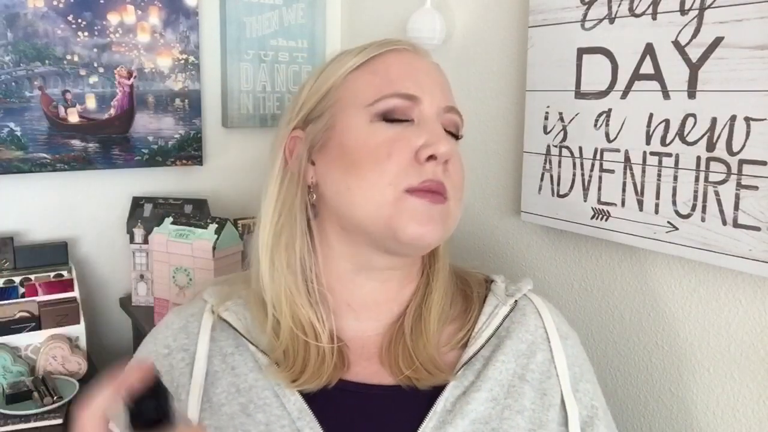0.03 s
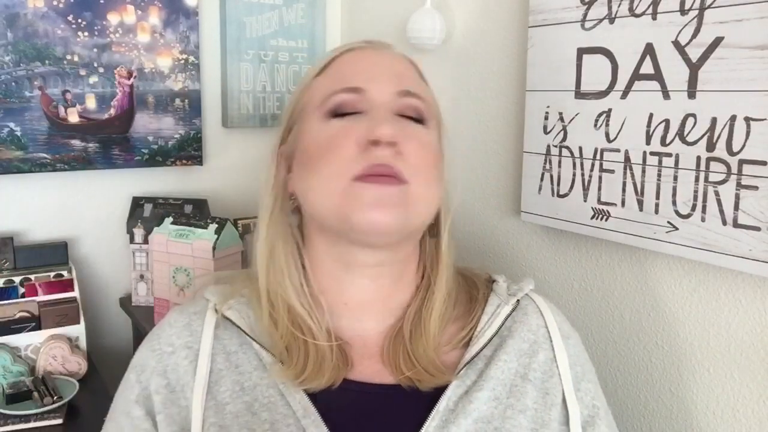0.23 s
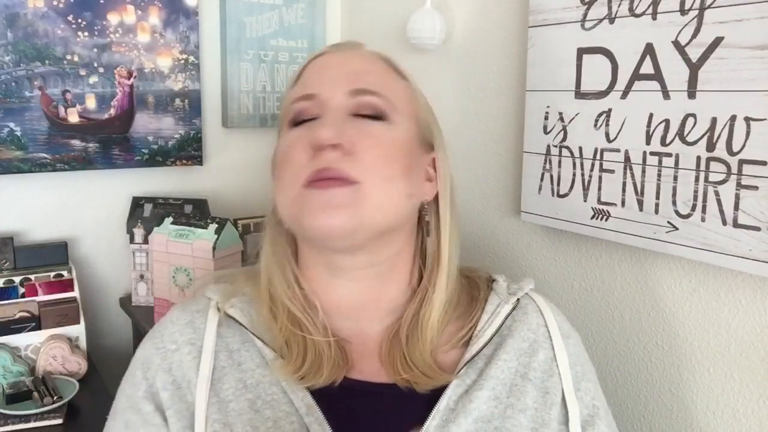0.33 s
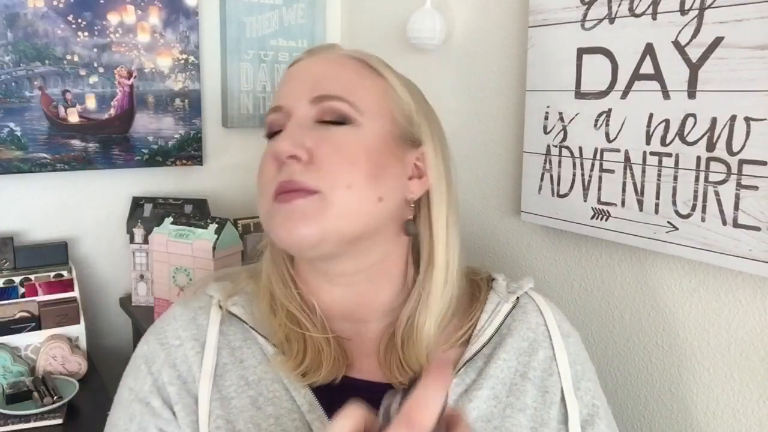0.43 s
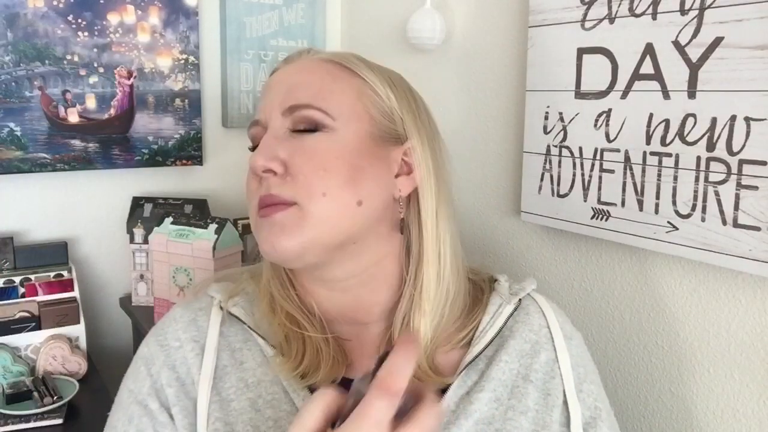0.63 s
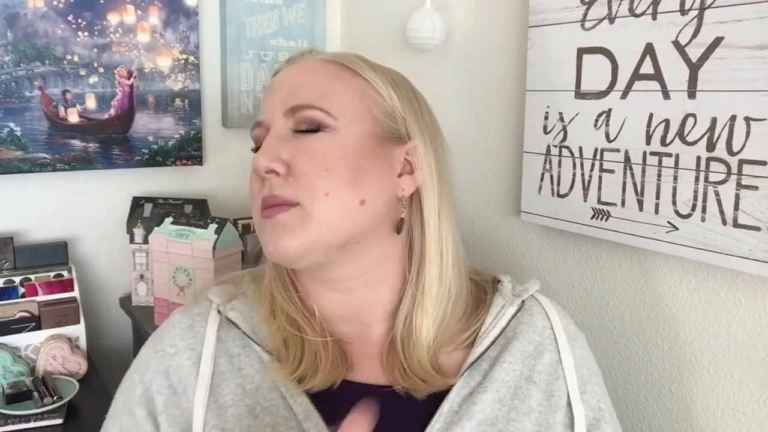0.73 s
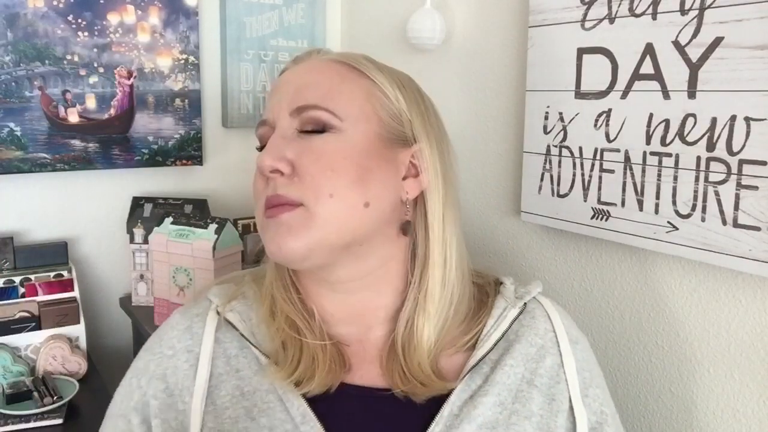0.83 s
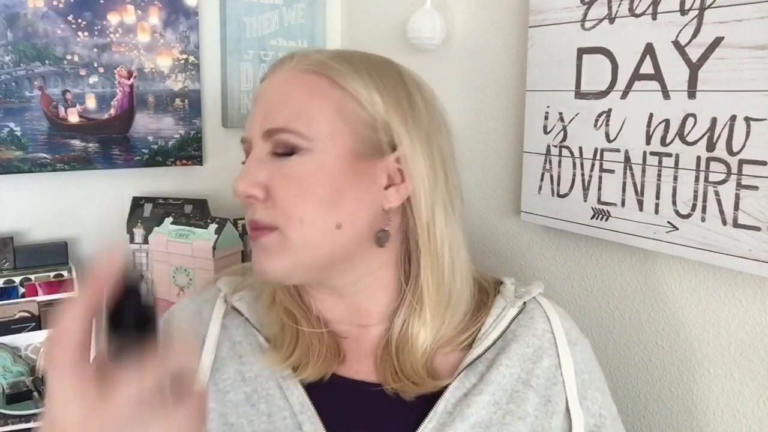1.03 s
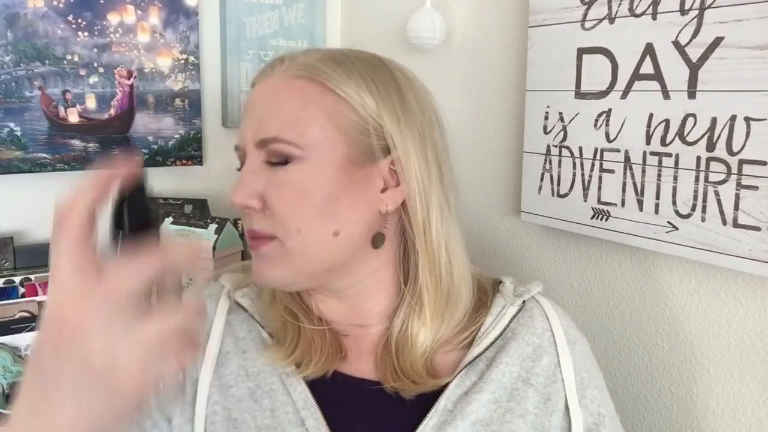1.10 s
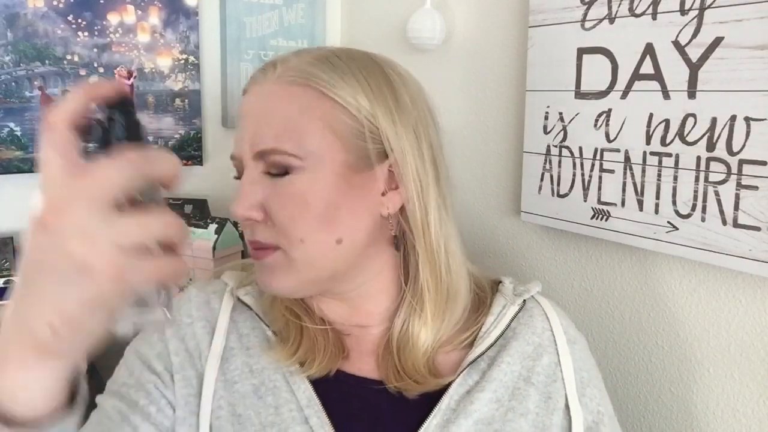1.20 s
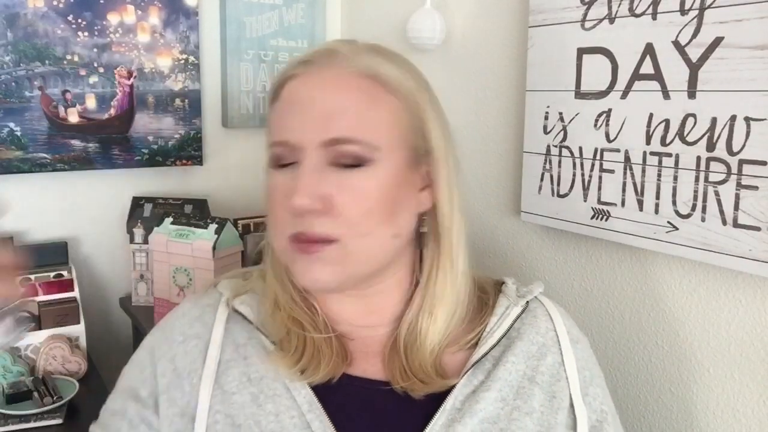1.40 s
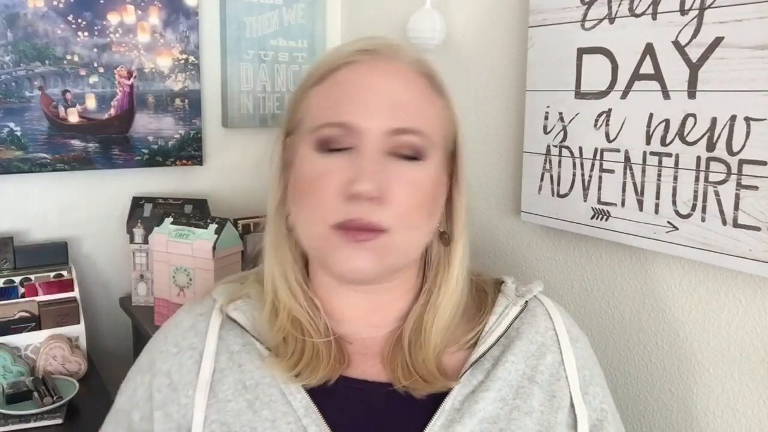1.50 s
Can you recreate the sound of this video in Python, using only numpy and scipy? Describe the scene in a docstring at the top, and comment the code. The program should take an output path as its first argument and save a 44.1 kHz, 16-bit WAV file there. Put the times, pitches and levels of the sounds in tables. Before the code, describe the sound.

Short spritzes from a pump spray bottle, some soft, some harder and juddering, with light clicks.

```python
"""A fine-mist pump bottle, worked close by in a small room.
Three smooth strokes give soft puffs of mist. Three hard ones judder: the plunger sticks and slips about
seventy times a second, each slip a snap that rings the bottle. Between strokes the cap ticks in the
hand and the bottle bloops as the pump refills. Faint room air lies underneath."""
import sys
import numpy as np
from scipy import signal
from scipy.fft import rfft, irfft, next_fast_len
from scipy.io import wavfile

SR = 44100
rng = np.random.default_rng(int(sys.argv[2]) if len(sys.argv) > 2 else 0)


def store_wav(level_fs):
    """Save 16-bit WAV to argv[1]."""
    pcm = np.round(np.clip(np.atleast_2d(level_fs), -1, 1) * 32767)
    wavfile.write(sys.argv[1], SR, pcm.T.astype(np.int16))


N = 68355


def amp(db):
    return 10 ** (np.asarray(db) / 20)


def unit_energy(x):
    return x / (np.linalg.norm(x) + 1e-12)


def fade(t, t60_s):
    return np.exp(-np.log(1000) * t / t60_s)


def along(points, hz):
    """Interpolate (f/Hz, value) points on a log frequency axis."""
    f, values = np.transpose(points)
    return np.interp(np.log(hz + 1), np.log(f + 1), values)


def add(track, at_s, sound):
    i = int(np.clip(round(at_s * SR), 0, N - 1))
    track[i:i + len(sound)] += sound[:N - i]


def noise(spectrum, tilt_db_per_oct=0):
    """Coloured noise, rms 1."""
    hz = np.fft.rfftfreq(N, 1 / SR)
    gain = amp(along(spectrum, hz) + tilt_db_per_oct * np.log2(hz + 1))
    x = irfft(rfft(rng.standard_normal(N)) * gain, N)
    return x / np.sqrt(np.mean(x ** 2) + 1e-20)


def click(spectrum, decay_s, size=2048):
    """Brief rough contact: a noise burst, part whitened, then coloured; energy 1."""
    t = np.arange(size) / SR
    gain = amp(along(spectrum, np.fft.rfftfreq(size, 1 / SR)))
    cepstrum = irfft(np.log(gain))
    cepstrum[1:size // 2] *= 2  # fold to minimum phase
    cepstrum[size // 2 + 1:] = 0
    burst = rfft(rng.standard_normal(size) * np.exp(-t / decay_s))
    whitened = burst / np.sqrt(np.abs(burst) + 1e-9)
    return unit_energy(irfft(whitened * np.exp(rfft(cepstrum)))[:size // 2])


def ring(hz, t60_s, attack_s, size=4096):
    """One damped mode, energy 1."""
    t = np.arange(size) / SR
    return unit_energy(np.sin(2 * np.pi * hz * t) * fade(t, t60_s) * (1 - np.exp(-t / attack_s)))


AIR_SPECTRUM = [(20, -40), (32, -24), (44, -3), (54, 9), (75, -7), (120, -1), (180, -7.5), (400, -8.5),
                (1000, -13), (3000, -15), (7000, -18.5), (11000, -24.5), (15500, -30)]  # f/Hz, level/dB


def room_air():
    """Steady background noise, mostly low rumble."""
    return amp(-69.5) * noise(AIR_SPECTRUM)


REFILL_BLOOPS = [(0.013, 1012, -40, 0.0051), (0.0021, 1050, -52.5, 0.0042), (1.381, 1040, -50, 0.0056)]  # t/s, f/Hz, peak/dB, half width/s


def bloops():
    """The pump refills: short hollow tones of the bottle."""
    t, out = np.arange(N) / SR, np.zeros(N)
    for at_s, hz, db, width_s in REFILL_BLOOPS:
        out += amp(db) * np.exp(-((t - at_s) / width_s) ** 2) * np.sin(2 * np.pi * hz * t)
    return out


CAP_CONTACTS = [(.0075, -33, -56, -42), (.168, -47, -35, -50), (0.199, -30, -50, -64),
                (.379, -33, -38, -48), (0.433, -48, -61, -58), (.610, -28, -38, -43.5),
                (.668, -49, -60, -58), (.896, -39, -61, -47), (0.9314, -32.5, -62, -33),
                (0.9358, -28.5, -66, -43), (0.941, -31, -43, -41), (1.0919, -26.5, -29, -27.5),
                (1.1191, -27.5, -36, -35), (1.172, -41, -44.5, -52), (1.377, -31.5, -38, -52)]  # t/s, tick/dB, bottle ring/dB, cap ring/dB
TICK_SPECTRUM = [(600, -19), (1400, -1.5), (2000, -1), (2600, -2.5), (3600, 1.5), (4800, -4), (6200, 0),
                 (9500, -5), (12000, -3), (15500, -9)]  # f/Hz, level/dB
BOTTLE_MODES = [(1023, -2.5, 0.038), (1540, -4.5, 0.026), (2010, -9.5, 0.035)]  # f/Hz, level/dB, T60/s


def cap_ticks():
    """Finger on cap: each contact clicks and rings cap and bottle."""
    out = np.zeros(N)
    for at_s, tick_db, bottle_db, cap_db in CAP_CONTACTS:
        add(out, at_s, amp(cap_db) * ring(hz=3320, t60_s=0.0068, attack_s=0.00051))
        add(out, at_s, amp(tick_db) * click(TICK_SPECTRUM, decay_s=0.0012))
        for hz, mode_db, t60_s in BOTTLE_MODES:
            detune = 1 + rng.normal(0, 0.0093)
            add(out, at_s, amp(bottle_db + mode_db) * ring(hz * detune, t60_s, attack_s=0.0021))
    return out


SMOOTH_STROKES = [(0.031, 0.027, 0.013, 0.072, -45, -0.5), (0.98, 0.018, .008, .044, -50.5, 1),
                  (1.209, .019, 0.036, 0.058, -47, -0.15)]  # t/s, attack/s, hold/s, release/s, level/dB, tilt/(dB/oct)
MIST_SPECTRUM = [(500, -30), (1000, -13.5), (1600, -3), (2300, 2), (3500, 3), (4900, 1.5), (6500, 1),
                 (8500, -2), (10300, -5), (11700, -2), (13500, -7.5), (15500, -1.5)]  # f/Hz, level/dB


def puffs():
    """The nozzle hisses while the pressure swells, holds and sinks."""
    t, out = np.arange(N) / SR, np.zeros(N)
    for at_s, attack_s, hold_s, release_s, db, tilt in SMOOTH_STROKES:
        pressure = np.interp(t, at_s + np.cumsum([0, attack_s, hold_s, release_s]), [0, 1, 1, 0])
        out += amp(db) * np.sin(np.pi / 2 * pressure) ** 2 * noise(MIST_SPECTRUM, tilt)
    return room(out, wet_db=-12)


def slips(sticking, force):
    """Stick-slip of the plunger; yields t/s, snap/dB, bottle/dB."""
    stick_s, waits_ms = np.transpose(sticking)
    force_s, snap_db, bottle_db = np.transpose(force)
    at_s = stick_s[0]
    while at_s <= stick_s[-1]:
        yield at_s, np.interp(at_s, force_s, snap_db), np.interp(at_s, force_s, bottle_db)
        at_s += np.interp(at_s, stick_s, waits_ms) / 1000


STICK_CURVES = [
    [(.2297, 4.85), (.2385, 6.5), (.2545, 15.45), (.278, 17.2), (.293, 12.3), (.313, 3.0)],
    [(.4619, 6.7), (.4845, 14.3), (.52, 14.9), (.563, 12.5)],
    [(.6934, 8.7), (.7085, 14.1), (.728, 15.0), (.768, 12.0), (.808, 11.5)],
]  # per hard stroke: t/s, wait to next slip/ms
FORCE_CURVES = [
    [(.2297, -21.5, -35), (.24, -11.5, -25.5), (.259, -5, -10.5), (.276, -9.5, -6.5), (.292, -3.5, -10.5),
     (.305, -17.5, -10.5), (.313, -44, -35)],
    [(.4619, -21.5, -32), (.478, -9, -13), (.49, -13.5, -8), (.519, -10, -5), (.535, -17, -8),
     (.548, -12, -11.5), (.562, -24, -26)],
    [(.6934, -19.5, -25), (.702, -11.5, -15.5), (.714, -9.5, -12.5), (.743, -14.5, -10), (.77, -19, -13),
     (.794, -14, -17), (.807, -28, -26.5)],
]  # per hard stroke: t/s, snap/dB, bottle/dB
HAND_GRIPS = [(1005, -2.5, 0, -0.5, 6860), (950, -4.5, -3, -6, 7400), (956, -3, -1.5, -8, 8080)]  # per hard stroke: ring f/Hz, ring/dB, knock/dB, creak/dB, nozzle f/Hz
SNAP_SPECTRUM = [(1500, -28), (3500, -1), (5000, -4.5), (7000, 0.5), (8200, -3.5), (10000, -10),
                 (11800, 1.5), (13500, -5), (15500, -6.5)]  # f/Hz, level/dB
KNOCK_SPECTRUM = [(40, -55), (120, -38), (250, -28.5), (480, -7), (750, -7.5), (1100, 3), (1450, -4),
                  (2100, 2.5), (2800, -6), (3800, -15.5), (7000, -25.5)]  # f/Hz, level/dB
SCRAPE_SPECTRUM = [(600, -21.5), (1500, -3), (2700, -2.5), (4300, -3.5), (5500, -7.5), (7200, -12.5),
                   (10000, -6), (15000, -20)]  # f/Hz, level/dB
SPIT_SPECTRUM = [(1500, -19), (3500, -7), (5000, -3.5), (7000, 0), (10000, -6), (12000, 1), (15500, -4.5)]  # f/Hz, level/dB


def judder(stroke):
    """Hard stroke. Per slip: seal creaks, nozzle snaps, bottle knocks and rings, mist spits."""
    ring_hz, ring_db, knock_db, creak_db, nozzle_hz = HAND_GRIPS[stroke]
    creak_lead_s, creak_start_hz, creak_sag_hz_per_s = 0.004, 3454, 16800
    snap_lead_s, knock_lag_s = 0.0002, 0.00022
    start_s = STICK_CURVES[stroke][0][0]
    out, flow, t = np.zeros(N), np.zeros(N), np.arange(SR // 10) / SR
    for at_s, snap_db, bottle_db in slips(STICK_CURVES[stroke], FORCE_CURVES[stroke]):
        snap_gain, bottle_gain = amp(rng.normal([snap_db, bottle_db], 0.2))
        nozzle_detune, low_detune, high_detune, creak_detune = rng.normal(1, 0.019, 4)

        nozzle = amp(-9) * ring(nozzle_hz * nozzle_detune ** 2, t60_s=0.0031, attack_s=0.0002)
        add(out, at_s - snap_lead_s, snap_gain * click(SNAP_SPECTRUM, decay_s=0.0004))
        add(out, at_s - snap_lead_s, snap_gain * nozzle)

        knock = amp(knock_db) * click(KNOCK_SPECTRUM, decay_s=0.00039)
        low_mode = amp(ring_db) * ring(ring_hz * low_detune, t60_s=0.027, attack_s=0.00051)
        high_mode = amp(-15) * ring(2220 * high_detune, t60_s=0.0074, attack_s=0.00051)
        add(out, at_s + knock_lag_s, bottle_gain * knock)
        add(out, at_s, bottle_gain * (low_mode + high_mode))

        if at_s > start_s + creak_lead_s:  # the seal gives just before the slip
            give_s = at_s - creak_lead_s * rng.normal(1, 0.1)
            creak_hz = (creak_start_hz - creak_sag_hz_per_s * (at_s - start_s)) * creak_detune
            seal_gain = bottle_gain * amp(creak_db)
            add(out, give_s, seal_gain * ring(creak_hz, t60_s=0.014, attack_s=0.0002))
            add(out, give_s, seal_gain * amp(-5.5) * click(SCRAPE_SPECTRUM, decay_s=0.0011))
        add(flow, at_s, snap_gain * fade(t, t60_s=0.017))
    spit = amp(-25.5) * flow * noise(SPIT_SPECTRUM)
    return room(out + spit, wet_db=-5)


REFLECTIONS = [(.0023, -12), (.00275, -25.5), (.0044, -15.5), (.0057, -17), (.0087, -17.5)]  # delay/s, level/dB
TAIL_DECAY = [(200, 0.29), (600, 0.29), (1000, 0.27), (2500, 0.29), (7000, 0.29), (15000, 0.22)]  # f/Hz, T60/s
TAIL_SPECTRUM = [(200, 1), (600, 3.5), (1000, 3), (2500, 0.5), (7000, -0.5), (15000, 6)]  # f/Hz, level/dB


def room(x, wet_db, onset_s=0.0026):
    """Direct sound, reflections off near surfaces, short diffuse tail at wet_db."""
    hz, t, bands = signal.stft(rng.standard_normal(SR // 2), SR, nperseg=256)
    bands *= amp(along(TAIL_SPECTRUM, hz))[:, None]
    bands *= fade(t, along(TAIL_DECAY, hz)[:, None])
    tail = signal.istft(bands, SR, nperseg=256)[1]
    build_up = 1 - np.exp(-(np.arange(len(tail)) / SR / onset_s) ** 2)
    response = amp(wet_db) * unit_energy(tail * build_up)
    response[0] += 1
    for delay_s, db in REFLECTIONS:
        response[round(delay_s * SR * rng.uniform(0.95, 1.05))] += amp(db)
    return signal.fftconvolve(x, response)[:N]


def scene():
    """Sprayer and handling over room air, mono."""
    spray = sum(judder(stroke) for stroke in range(len(HAND_GRIPS))) + puffs()
    handling = room(bloops() + cap_ticks(), wet_db=-12.5)
    return (spray + handling + room_air())[None]


def record(dry):
    """Steep low-pass."""
    cutoff_hz, size = 15800, next_fast_len(N + SR // 2)
    hz = np.fft.rfftfreq(size, 1 / SR)
    return irfft(rfft(dry, size) / (1 + (hz / cutoff_hz) ** 120), size)[:, :N]


dry = scene()
out = record(dry)
store_wav(out)
```